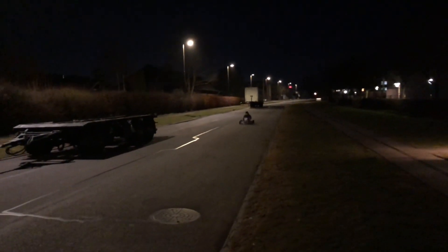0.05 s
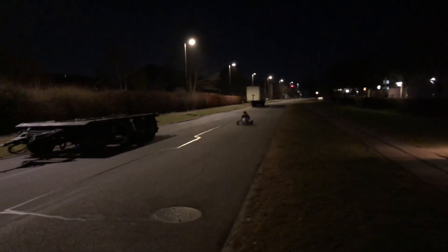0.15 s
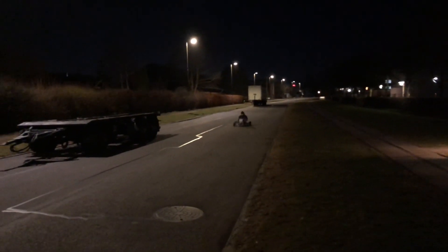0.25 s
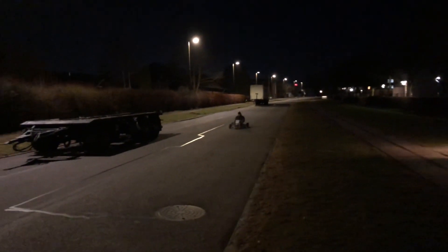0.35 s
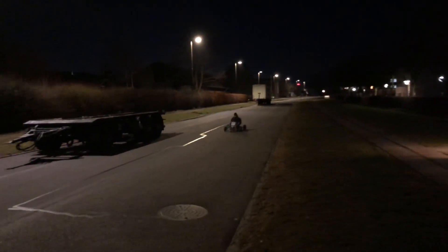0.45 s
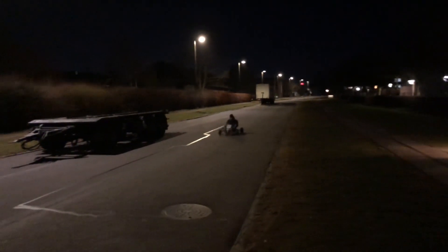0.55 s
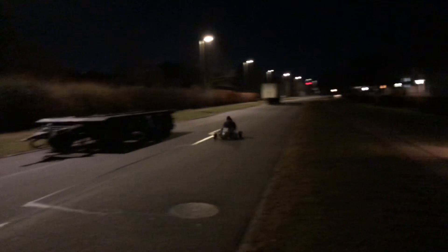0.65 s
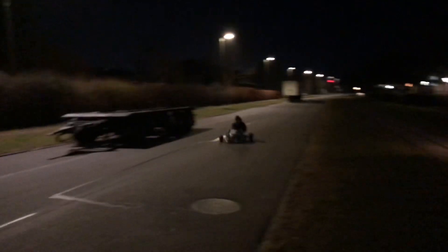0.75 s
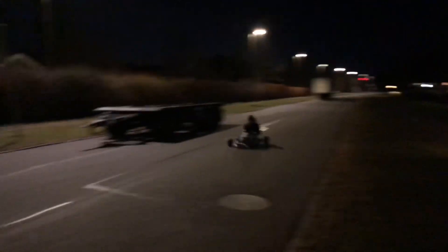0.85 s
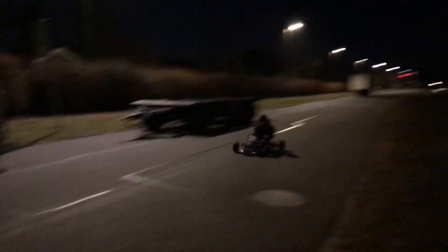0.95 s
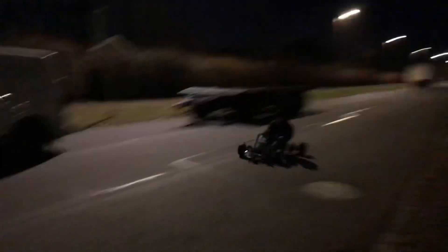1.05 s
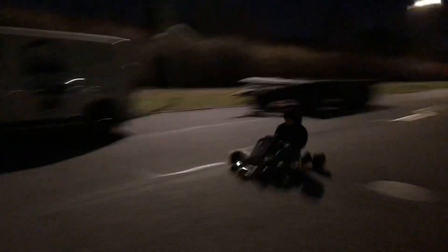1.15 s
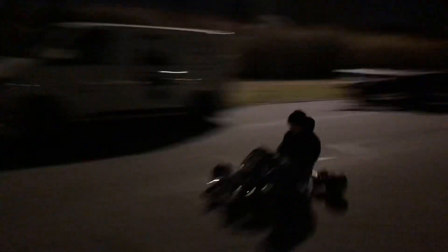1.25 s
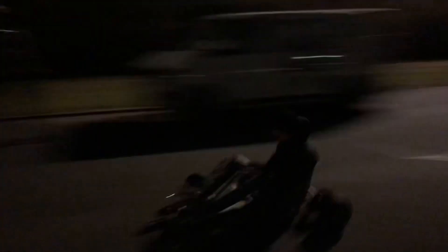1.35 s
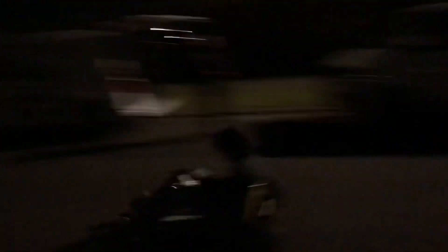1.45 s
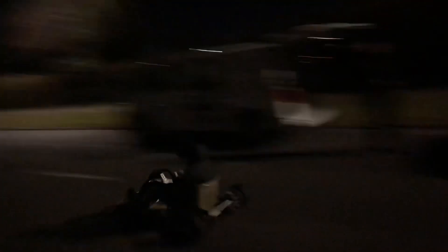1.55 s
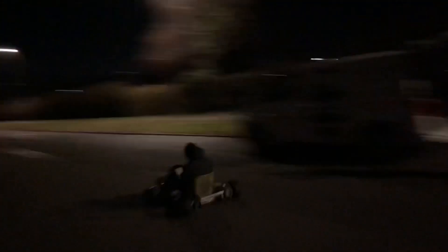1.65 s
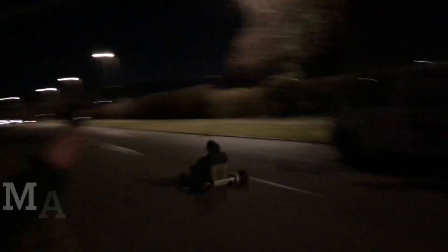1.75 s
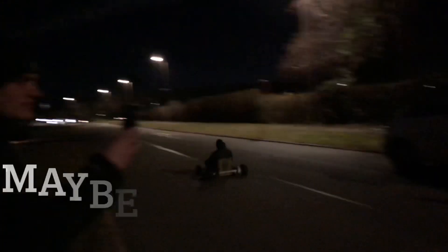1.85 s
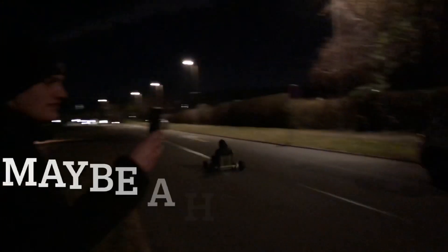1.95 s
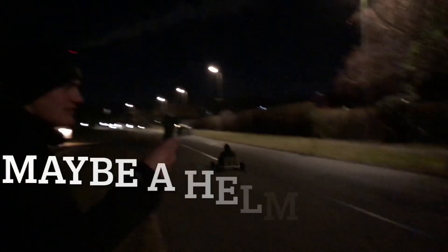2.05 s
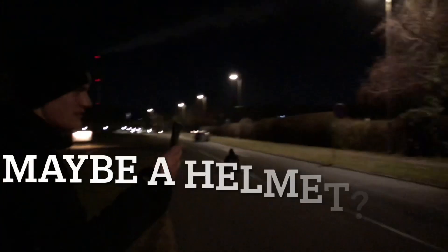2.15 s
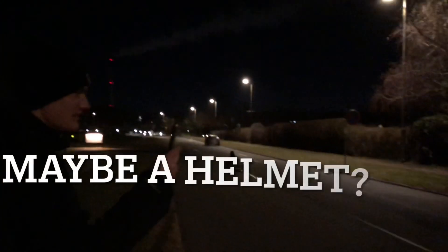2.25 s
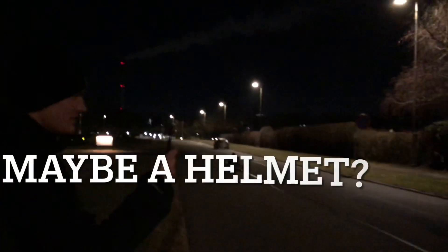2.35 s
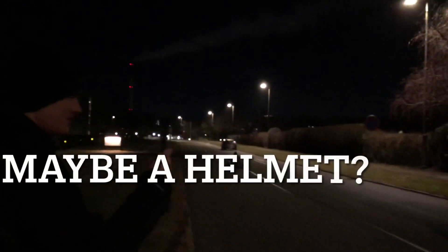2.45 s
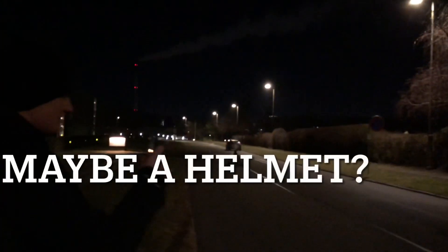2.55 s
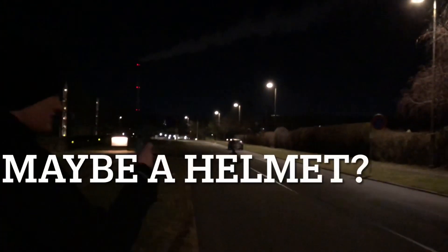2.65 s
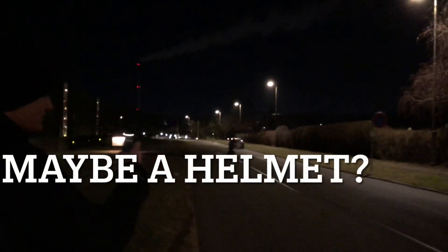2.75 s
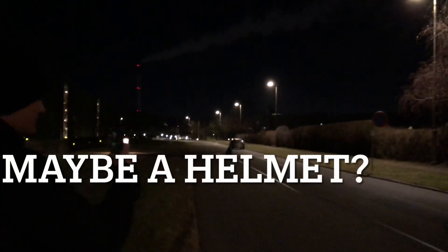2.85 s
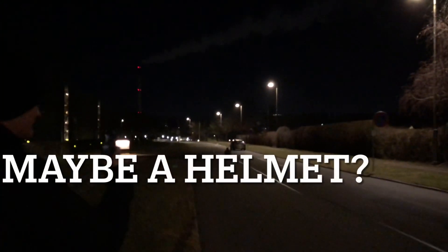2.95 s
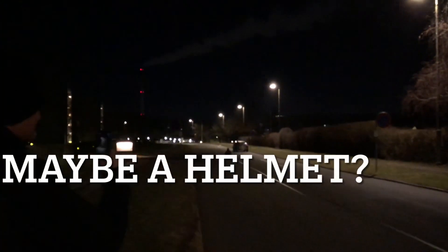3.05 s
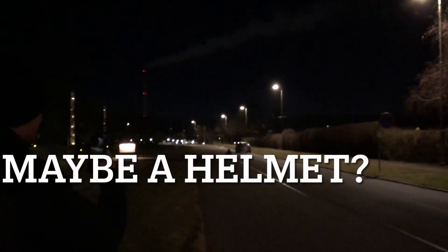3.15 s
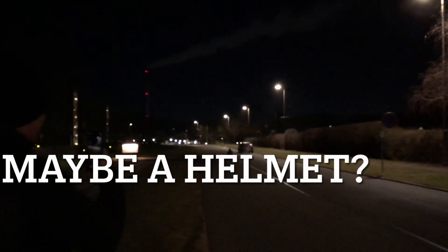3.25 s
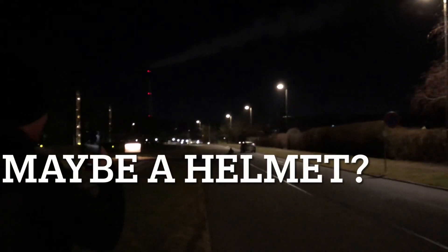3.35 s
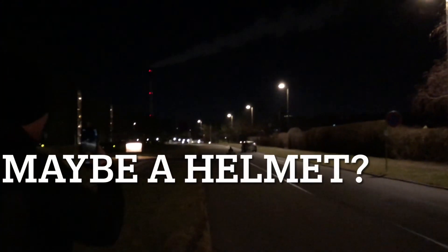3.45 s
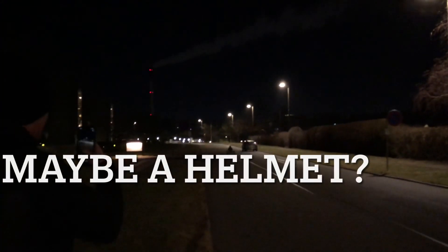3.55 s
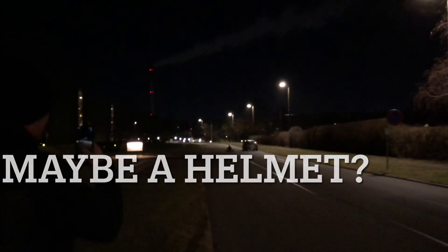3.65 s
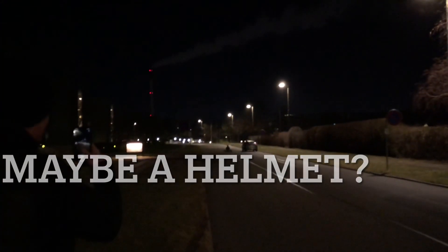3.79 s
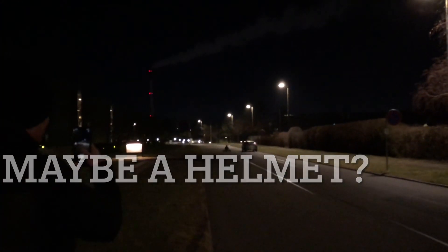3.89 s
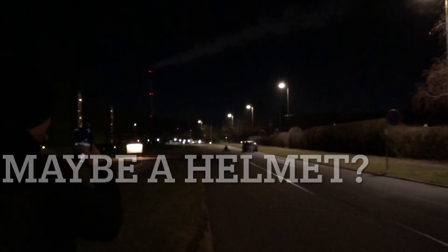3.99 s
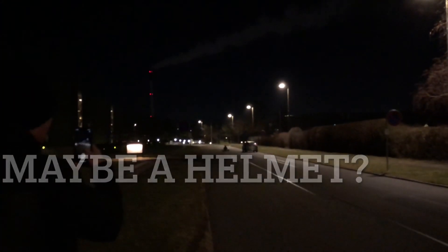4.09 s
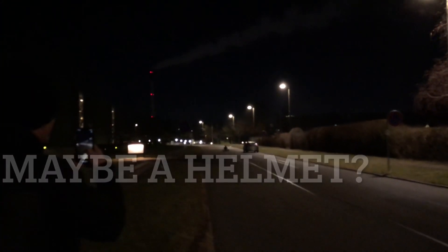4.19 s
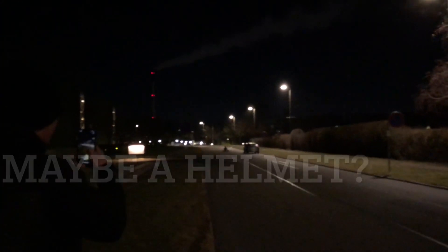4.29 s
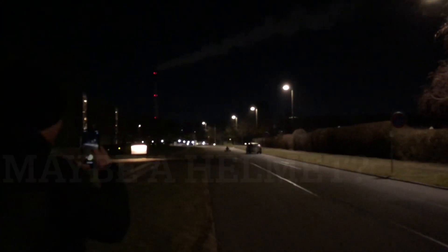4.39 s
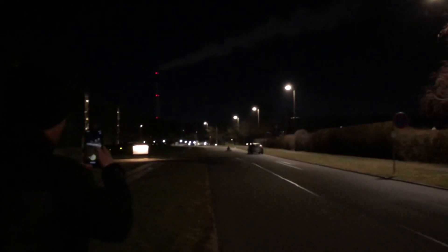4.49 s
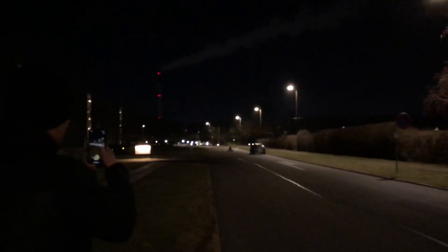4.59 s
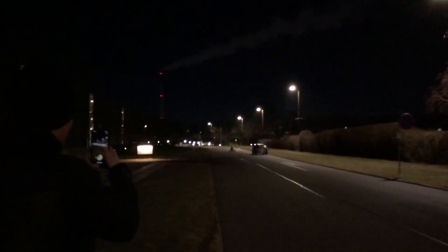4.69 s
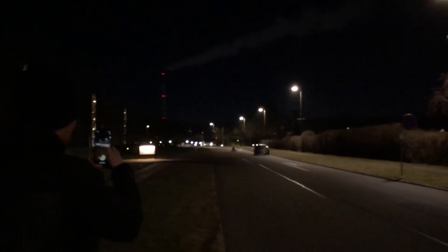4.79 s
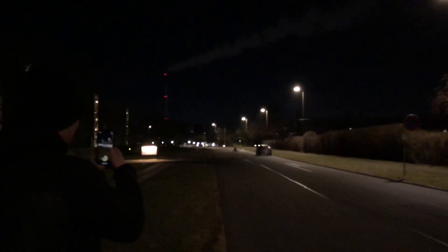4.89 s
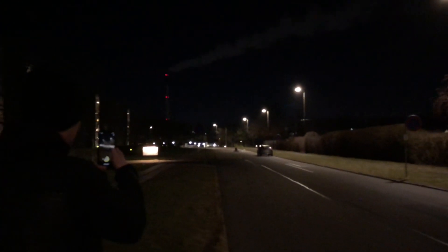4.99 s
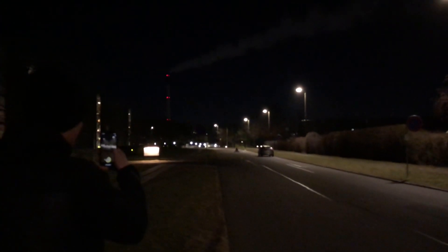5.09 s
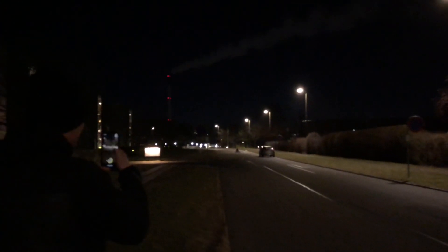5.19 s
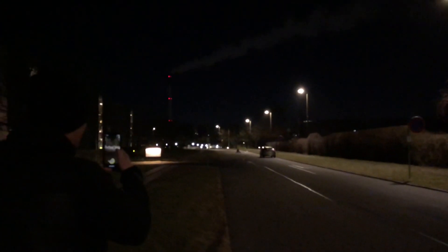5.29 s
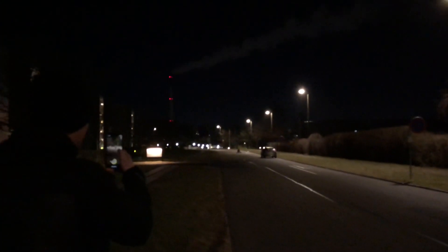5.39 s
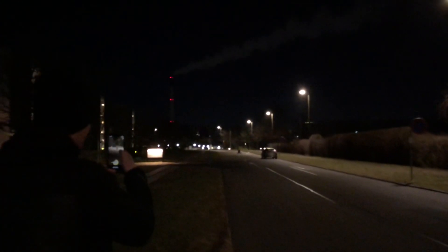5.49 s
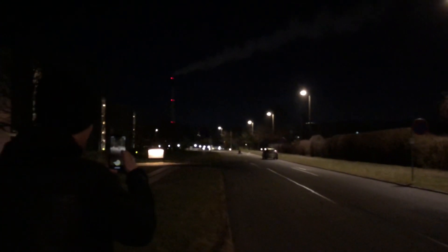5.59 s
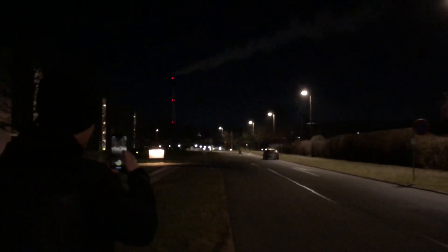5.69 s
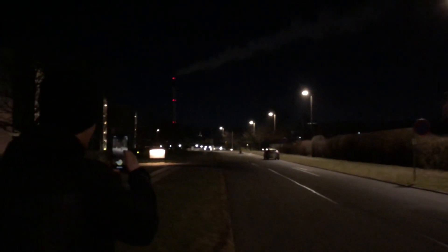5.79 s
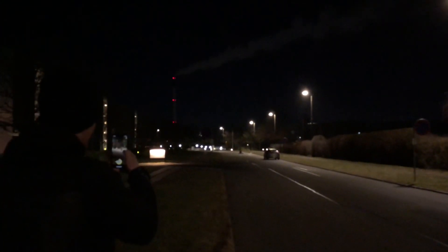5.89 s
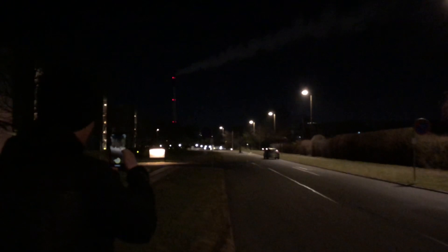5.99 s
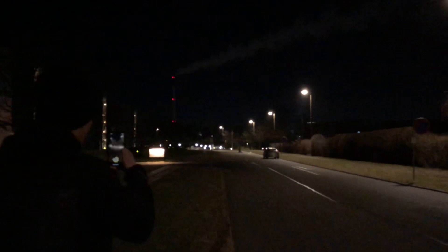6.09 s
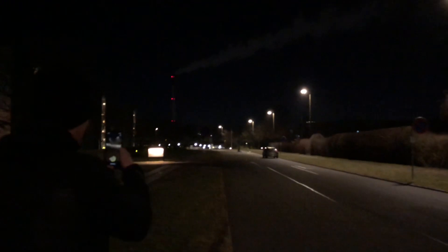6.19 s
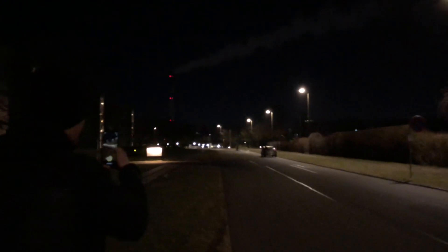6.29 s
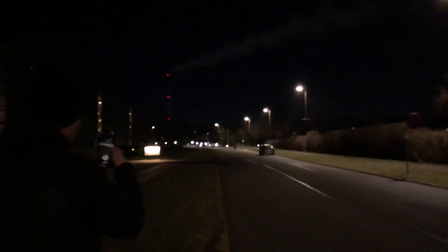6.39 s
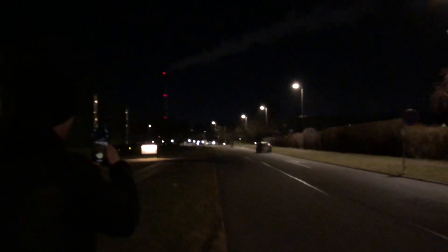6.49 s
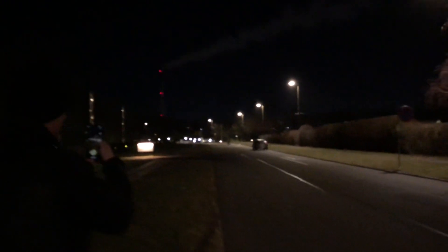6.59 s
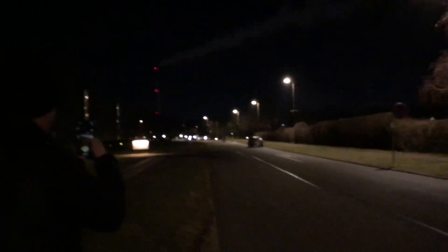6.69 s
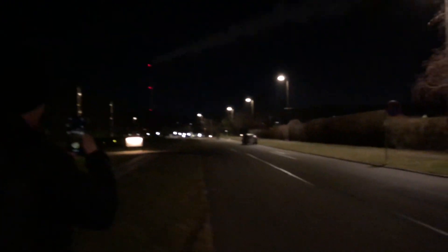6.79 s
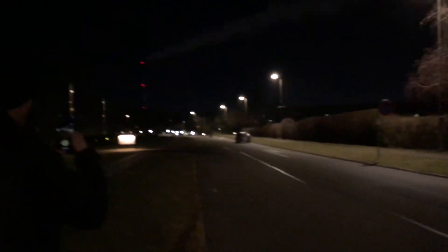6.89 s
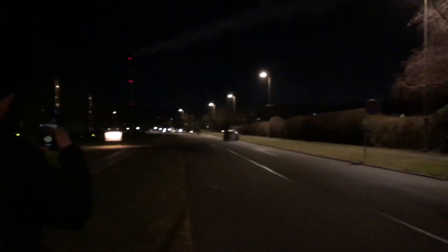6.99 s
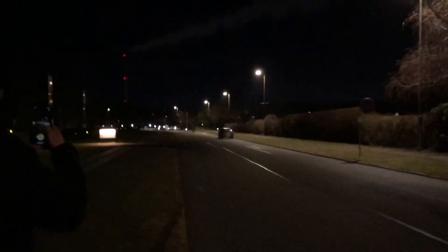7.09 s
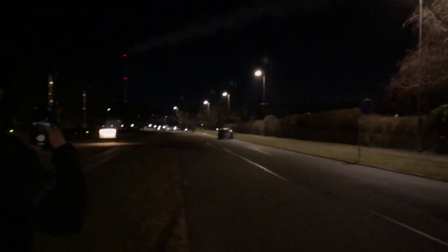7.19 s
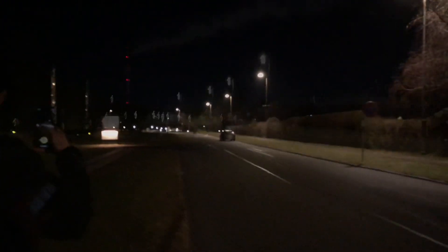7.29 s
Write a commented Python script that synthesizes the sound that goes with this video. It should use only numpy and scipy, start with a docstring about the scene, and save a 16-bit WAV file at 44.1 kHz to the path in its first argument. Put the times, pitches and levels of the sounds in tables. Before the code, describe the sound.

A handheld roadside microphone catches one fast pass of a small electric kart: rough metallic chain clatter and a buzzing high whine, asphalt tyre roar, a sudden close swell and short low gust. The pitch drops as it leaves, the tone growing clearer and more singing from behind. Then it coasts, slackening and sliding steadily lower into the distance, over a dim low town rumble, faint hiss and dry ticks.

```python
"""Electric go-kart at night

An electric go-kart comes down a street, passes close to the microphone, runs away and then coasts.
The teeth of its motor sprocket make the chain whine and rattle; the frame rings and the tyres roar.
Its wake buffets the microphone. A parked lorry and the hedges echo it, a trailer mirrors it,
and faint tones, hiss and ticks join the low wash of a quiet town. Sines make the tones, noise the rest."""
import sys
import numpy as np
from scipy import signal
from scipy.fft import rfft, irfft
from scipy.io import wavfile
from scipy.ndimage import map_coordinates

SR = 44100
rng = np.random.default_rng(int(sys.argv[2]) if len(sys.argv) > 2 else 0)


def store_pcm(level_fs):
    """Save levels as 16-bit WAV."""
    pcm = np.round(np.clip(level_fs, -1, 1) * 32767).astype(np.int16)
    wavfile.write(sys.argv[1], SR, np.atleast_2d(pcm).T)


N = 323694
TIME = np.arange(N) / SR  # seconds
FREQS = np.maximum(np.fft.rfftfreq(N, 1 / SR), 1)  # Hz
TEETH = 10  # on the motor sprocket
SOUND_M_S = 343
NEAR_M = 4.97  # closer than about this, the level flattens out


def undb(db):
    """Turn decibels into a gain."""
    return 10 ** (np.asarray(db) / 20)


def curve(rows):
    """Draw lines through a table of (seconds, value, ..): one value per sample for each column."""
    seconds, *columns = np.transpose(rows)
    return np.squeeze([np.interp(TIME, seconds, column) for column in columns])


def unit(x):
    """Scale a sound to rms 1."""
    return x / np.std(x)


def noise():
    """White noise."""
    return rng.standard_normal(N)


def walk(rate, size=8192):
    """A smooth random wander of spread about 1 that changes about rate times a second."""
    return unit(np.interp(2 * rate * TIME, np.arange(size), rng.standard_normal(size)))


def colour(x, points):
    """Filter a sound by a spectrum of (Hz, dB) points."""
    hz, db = np.transpose(points)
    gain = undb(np.interp(np.log(FREQS), np.log(hz), db))
    return irfft(rfft(x) * gain, N)


def band(x, lo_hz, hi_hz):
    """Keep the part of a sound between two frequencies."""
    return irfft(rfft(x) * ((FREQS > lo_hz) & (FREQS < hi_hz)), N)


def resonance(hz, centre, width):
    """Power response of one resonance, 1 at its centre."""
    return 1 / (1 + (2 * (hz - centre) / width) ** 2)


def delay(x, seconds):
    """The same sound, later."""
    return np.interp(TIME - seconds, TIME, x, left=0)


def swell(at, half):
    """A bell-shaped rise and fall around one moment, 1 at its top."""
    return np.exp(-((TIME - at) / half) ** 2)


def by_side(facing, values):
    """Blend between the values of the sides that the kart shows."""
    return np.interp(facing, np.arange(len(values)), values)


def tone(turns, order, smear, smear_hz=34):
    """A sine at a multiple of a turning rate, rms about 1; random sidebands smear its pitch."""
    rate = smear_hz * max(1, order / TEETH)  # high multiples smear over a wider band
    angle = 2 * np.pi * (order * turns + rng.random())
    steady = (np.sqrt(2) + smear * walk(rate)) * np.sin(angle)
    smeared = smear * walk(rate) * np.cos(angle)
    return (steady + smeared) / np.sqrt(1 + smear ** 2)


# Colour of the town's wash. Each row: frequency in Hz, level in dB.
TOWN = [(25, -27.5), (45, -1.5), (75, 4), (120, 5.5), (250, -6), (380, -9.5), (620, 2), (1100, -17.5),
        (2000, -14.5), (3000, -9), (4200, -29), (8500, -33), (10500, -40.5), (15000, -54.5)]
# A faint far-off tone. Each row: time in seconds, pitch in Hz, level in dB.
FAR_TONE = [(0, 1022, -89.5), (4.2, 950, -54), (4.6, 979.4, -60), (5.3, 1103, -58), (5.6, 1180, -67),
            (7.34, 1168, -94)]
TOWN_DB = -49.5


def town():
    """The low wash of a town at night is filtered noise, with one faint gliding sine in it."""
    hz, db = curve(FAR_TONE)
    wash = unit(colour(noise(), TOWN)) * undb(TOWN_DB + .7 * walk(2.7))
    return wash + undb(db) * tone(np.cumsum(hz) / SR, 1.0, 0.94)


# One faint hiss: middle in seconds, half length in seconds, centre in Hz, width in Hz,
# level in dB at the top of the swell.
FAR_HISS = (6.77, .27, 3050, 600, -52)


def far_hiss():
    """A narrow band of noise swells and fades in the distance."""
    at, half, hz, width_hz, db = FAR_HISS
    hiss = unit(irfft(rfft(noise()) * resonance(FREQS, hz, width_hz), N))
    return hiss * undb(db + 1.3 * walk(8.9)) * swell(at, half)


# Small dry ticks. Each row: start in seconds, level in dB before colouring.
CLICKS = [(6.674, -35), (6.934, -46), (7.199, -47)]


def clicks(decay_s=0.004):
    """Each dry tick is a burst of noise that dies away within milliseconds."""
    bursts = sum(undb(db) * (TIME > s) * np.exp(-np.abs(TIME - s) / decay_s) for s, db in CLICKS)
    spectrum = [(500, -18), (2500, 0), (6000, 2), (7500, -12), (9000, -18), (15000, -35)]
    return colour(noise() * bursts, spectrum)


# Low hums around and after the closing of the throttle.
# Each row: middle in seconds, half length in seconds, nominal pitch in Hz, level in dB.
HUMS = [(3.82, .11, 587, -46), (4.01, .08, 595, -50), (4.12, .12, 708, -50), (4.14, .1, 407, -46.5),
        (4.76, .2, 700, -54), (5.02, .22, 598, -51)]


def hums(smear=0.26):
    """Soft low tones of steady pitch swell and fade."""
    # each tone sounds slightly below its nominal pitch
    return sum(undb(db) * swell(at, half) * tone(hz * TIME, 0.97, smear) for at, half, hz, db in HUMS)


GUST_S, GUST_ATTACK_S, GUST_HOLD_S, GUST_RELEASE_S = 1.19, 0.057, 0.27, .04
GUST_DB, DRAUGHT_DB = -36, -39.5  # the draught's level is before the loss with distance


def wake(spread_db):
    """Air pushed over the microphone makes a short low buffet over a weak draught."""
    spectrum = [(25, -40.5), (36, -23), (60, -1.0), (110, -5.0), (230, -6.0), (500, -13.5), (2000, -54.0)]
    rumble = unit(colour(noise(), spectrum))
    early = np.maximum(GUST_S - TIME, 0)
    late = np.maximum(TIME - GUST_S - GUST_HOLD_S, 0)
    gust = undb(GUST_DB) * np.exp(-early / GUST_ATTACK_S - late / GUST_RELEASE_S)
    push = gust + undb(DRAUGHT_DB + spread_db)
    return rumble * push * undb(2 * walk(11))


# Level of the clear echo off the lorry. Each row: time in seconds, level against the direct sound in dB.
ECHO = [(0, -26), (3.9, -24), (4.42, -15), (4.58, -5), (4.67, -4.5), (4.8, -12), (5.1, -15), (7.34, -16)]
ECHO_S = .06023  # extra travel time of the echo


def street(x, t60=0.56, wet_db=-17):
    """Add one clear echo from the lorry, and a thin decaying scatter from hedges and kerbs."""
    t = TIME[:SR]
    grain = colour(noise(), [(100, -4.5), (2500, -5.0), (6000, 1.5), (15000, -24.5)])[:SR]
    scatter = grain * undb(-60 * t / t60) * (t > .015)
    tail = signal.fftconvolve(x, scatter / np.linalg.norm(scatter))[:N]
    return x + undb(curve(ECHO)) * delay(x, ECHO_S) + undb(wet_db) * tail


KERB_M = 2.68  # closest distance of the kart
MIRROR_M, MIRROR_REACH_M = 9, 9.3  # closest distance of the mirror image, reach of the reflection
MIRROR_DB = -7  # before the losses with distance


def trailer(x, metres):
    """A trailer parked across the road reflects the kart: the longer path has its own Doppler shift,
    so the tones split as the kart goes by."""
    mirrored = np.sqrt(metres ** 2 - KERB_M ** 2 + MIRROR_M ** 2)
    reach = np.exp(-(metres / MIRROR_REACH_M) ** 2)
    gain = undb(MIRROR_DB) * reach * np.hypot(metres, NEAR_M) / np.hypot(mirrored, NEAR_M)
    extra_s = (mirrored - metres) / SOUND_M_S
    return gain * map_coordinates(x, [(TIME - extra_s) * SR], mode="nearest")


# Colour of the tyre roar. Each row: frequency in Hz, level in dB.
TYRES = [(40, -31), (70, -9), (130, -4), (270, -3), (500, 2), (800, -0.5), (1300, -2.5), (2200, -5),
         (5000, -16.5), (10000, -50)]


def tyres(roar_db, patchy_db=1.0):
    """Small slick tyres roar on patchy asphalt: filtered noise of uneven level."""
    x = colour(noise(), TYRES)
    x = x / np.std(band(x, 600, 1300))
    return x * undb(roar_db + patchy_db * walk(39))


# Resonances of frame and motor mount. Each row: centre in Hz, width in Hz,
# lift in dB for a tone that slides through, strength of its own ring in dB against the other rows.
FRAME = [(424, 76, 11.5, 3.5), (589, 22, 7, -1), (699, 25, 3, -5.5), (1737, 227, 8.5, -2),
         (2199, 136, 8.5, -1.5), (2780, 41, 4.5, -16), (3210, 500, 4.5, -10), (3457, 106, 12.5, -10),
         (4390, 450, 1, -9.5)]
FRAME_TAUT_DB, FRAME_SLACK_DB = -34, -23.5  # under a taut and a slack chain, before distance and speed
FRAME_FALL = 0.42  # share of the fall with distance that the ring follows
FRAME_SPEED_POWER = 2.87  # dB lost for each dB that the motor slows


def lift(hz):
    """Decibels that the frame's resonances add to a tone."""
    return sum(db * resonance(hz, f, w) for f, w, db, _ in FRAME)


def frame(throttle, spread_db, speed_db):
    """Tubes and floor pan ring at fixed pitches, whatever the speed; a slack chain shakes them hardest."""
    shape = sum(undb(db) * resonance(FREQS, f, w) for f, w, _, db in FRAME)
    ring = unit(irfft(rfft(noise()) * shape, N))
    shake_db = throttle * FRAME_TAUT_DB + (1 - throttle) * FRAME_SLACK_DB + FRAME_SPEED_POWER * speed_db
    return ring * undb(shake_db + FRAME_FALL * spread_db + 1.0 * walk(13))


# Depth of the kart's directional lobes for tones and rattle, and changes per second.
LOBE_TONE_DB, LOBE_RATTLE_DB, LOBE_RATE = 1.8, 1.1, 17


def lobe(close, depth_db):
    """A gain that comes and goes while the kart is close, with about the same mean power."""
    spread_db = depth_db * close
    return undb(spread_db * walk(LOBE_RATE) - spread_db ** 2 * np.log(10) / 20)


def lobes(x, close, count=14):
    """Give each band of the rattle its own lobes, which sweep over the microphone."""
    spectrum, centres = rfft(x), np.geomspace(1500, 14000, count)
    out = 0
    for weights in np.eye(count):
        part = irfft(spectrum * np.interp(FREQS, centres, weights), N)
        out = out + part * lobe(close, LOBE_RATTLE_DB)
    return out


def air(x, shine, mid_power=0.93, top_power=1.62):
    """Scale the treble by a moving gain; the higher the band, the more it follows."""
    spectrum, centres = rfft(x), (4000, 7000, 12500)
    out = 0
    for weights, power in zip(np.eye(len(centres)), (0, mid_power, top_power)):
        out = out + irfft(spectrum * np.interp(FREQS, centres, weights), N) * shine ** power
    return out


# Colour of the rattle from ahead, from behind and with a slack chain.
# Each row: frequency in Hz, level in dB before the treble is scaled.
RATTLE_AHEAD = [(700, -30.5), (1400, -6), (2000, -3), (2600, -1), (3800, 0), (5000, -2.5), (6000, -7),
                (7500, -8), (8500, -12.5), (10200, -15), (11000, -20.5), (12700, -21.5), (15500, -30)]
RATTLE_BEHIND = [(700, -13), (1400, -5), (2300, 0.5), (3400, 1.5), (4100, 0), (4750, 1.5), (5400, -5),
                 (6100, -2), (7200, -5.5), (8000, -8), (9500, -12), (10600, -19.5), (11900, -17),
                 (15500, -34.5)]
RATTLE_SLACK = [(700, -33), (1300, -32.5), (2200, 3), (3100, 2), (4300, -1.5), (5400, -4), (6300, -2.5),
                (7500, -8.5), (8700, -11), (9800, -23), (12000, -28.5), (15500, -51)]
# The rattle swells and fades, and so does its treble.
# Each row: time in seconds, change of level in dB, change of treble in dB before air() weighs it.
RATTLE_SWELL = [(0, 0.5, -2), (.42, 0.5, 1), (.8, 0, 0), (1.0, 1, -3.5), (1.13, 0.8, -0.5), (1.25, 3, -1.1),
                (1.41, 1.5, -0.4), (1.52, -1.5, 0.5), (1.62, -1.5, 0), (1.74, 0, 1), (2.05, -1, -1),
                (2.26, -1, 1), (2.42, -1.7, 1), (2.6, 1, -3), (2.95, 1.5, -3.5), (3.45, -0.5, 1),
                (3.85, 0, -1.5), (4.25, -0.5, 1.5), (4.6, 2.5, -1), (5.1, 4, -2.5), (5.68, 0.5, 0.5),
                (5.95, 1, 1), (6.9, 3, -2), (7.34, -1, 2)]


def rattle(hz, turns, facing, throttle, body_db, treble_db,
           repeat=0.1, bite=0.44, flutter_db=0.94, sway_db=0.64):
    """Rollers clatter on the teeth: noise pulses at the tooth rate, and its treble dies with distance."""
    pulses = 1 + bite * np.cos(2 * np.pi * TEETH * turns)
    strikes = noise() * pulses * undb(flutter_db * walk(70))
    # inner and outer links alternate, so the clatter partly repeats every second tooth
    repeated = repeat * throttle * np.clip(facing + 0.2, 0, 1)
    strikes = strikes + repeated * delay(strikes, 2 / (TEETH * hz))
    behind = np.clip(facing - .5, 0, 1)
    parts = ((RATTLE_AHEAD, throttle * (1 - behind)), (RATTLE_BEHIND, throttle * behind),
             (RATTLE_SLACK, 1 - throttle))
    swell_db, shine_db = curve(RATTLE_SWELL)
    out = 0
    for spectrum, share in parts:
        x = colour(strikes, spectrum)
        x = x / np.std(band(x, 2900, 4300))  # body at rms 1
        shine = undb(treble_db + shine_db) / np.std(band(x, 8000, 14000))
        out = out + share * air(x, shine)
    return out * undb(body_db + swell_db + sway_db * walk(8))


# Tones of the drive. Each row: multiple of the motor turn, then level against the rattle in dB, before
# the changes below, from ahead, beside, rear quarter, behind, far behind, and when coasting.
TONES = [(1, -20, -14.5, -19, -15, -13, -37), (2, -16, -19.5, -25.5, -15.5, -14, -13),
         (3, -21, -32, -21.5, -40, -36, -15), (5, -34, -19, -17.5, -14.5, -27, -20.5),
         (7, -29, -17.5, -18.5, -9, -17.5, -27.5), (8, -16, -13.5, -7.5, -14.5, -17, -12),
         (9, -16.5, -16, -16.5, -5.5, -7, -16.5), (11, -16.5, -5, -22, -14, 0, -9),
         (12, -12, -15.5, -31.5, -17, -10, -10.5), (13, -14, -16.5, -25, -12.5, -13, -23.5),
         (14, -25.5, -21.5, -26.5, -20, -13, -27.5), (15, -11.5, -6, -3, -7.5, -6, -30.5),
         (19, -22, -7.5, -1.5, 3.5, -35, -34.5), (20, -7.5, .5, -3, 1, -2, -18),
         (21, -18, -6, -17, -5, -25.5, -19.5), (25, -27, -14, -7.5, -8, -11, -29.5),
         (26, -29.5, -4.5, -14, -24, -15, -25.5), (29, -4, -10.5, -4.5, -16, -29, -26.5),
         (30, -6.5, -23, -7, -11, -7, -29), (40, -10, -5.5, -5.5, -11, -16, -33),
         (50, -25, -11, -13, -17, -18, -31)]
# Single tones of the drive swell and fade: some briefly as the kart goes by, others while it coasts
# and they slide through the frame's resonances.
# Each row: multiple of the motor turn, middle in seconds, half length in seconds, change in dB.
TONE_SWELLS = [(7, 1.33, .08, 6), (7, 1.51, .035, 6), (8, 1.21, .07, 9), (8, 1.7, .12, -4),
               (8, 1.96, .07, 3), (8, 4.3, .22, 5), (8, 4.8, .07, 6), (8, 5.4, .25, 4), (9, 1.55, .04, 5),
               (9, 2.92, .16, 4), (9, 3.72, .17, 5), (11, 1.56, .07, 5), (11, 3.72, .1, -7),
               (11, 6.3, .22, 5), (11, 1.4, .06, 3), (12, 5.45, .12, 8), (12, 6.36, .08, 9),
               (12, 6.65, .09, 8), (15, 1.42, .035, 7), (15, 1.61, .05, 3), (15, 1.75, .09, -10),
               (15, 2.12, .07, 3), (19, 1.62, .06, 4), (19, 1.84, .08, -7), (20, 1.65, .06, -7),
               (20, 1.92, .07, -6), (20, 2.24, .06, -6)]
# How far the drive tones stand out of the rattle. Each row: time in seconds, change in dB.
SINGING = [(0, -2.5), (.9, -1.5), (3.9, -3), (5.5, 4.5), (6.4, 1), (6.8, 2), (7.34, -8)]
# The tones around the octave of the tooth tone swell and fade together.
# Each row: time in seconds, change in dB.
OCTAVE_SWELL = [(0, -5), (.92, -3), (1.05, 3), (1.27, 3), (1.4, -1), (1.52, 1), (1.74, 3), (1.86, -1.5),
                (2.0, 1), (2.3, -3), (2.5, 1.5), (2.85, 1.5), (2.97, -3), (3.1, 2), (3.6, -1)]
# The tooth tone swells and fades. Each row: time in seconds, change in dB.
TOOTH_SWELL = [(0, 7), (.4, -8), (.7, 8), (1.11, 2), (1.3, -1), (1.44, 2), (1.52, -2), (1.59, 4),
               (1.82, -5), (1.95, -1.5), (2.25, 3.5), (2.33, 4.5), (2.9, 4.5), (3.35, 0), (3.69, 8),
               (4.02, -12), (4.13, 1.5), (4.34, 3.5), (4.48, 1.5), (4.64, 5), (4.76, 0.5), (5.02, -3),
               (5.2, 11), (5.34, 3.5), (5.5, 7), (5.87, 7), (5.96, -2), (6.3, -4), (6.6, -9), (6.92, 2.5),
               (7.34, -1)]
# Smear of the tooth tone, ragged as the throttle closes.
# Each row: time in seconds, smear as a share before the roughness from ahead.
TOOTH_SMEAR = [(0, .34), (1.5, .3), (2.2, .22), (2.9, .28), (3.5, .6), (3.9, .5), (4.15, .25), (4.65, .3),
               (5.1, .4), (5.5, .15), (5.85, .13), (6.05, .5)]
TOOTH_COAST_DB = -0.5  # tooth tone against the rattle when coasting, before its swells
ROUGH_AHEAD = .9  # extra share of smear while the kart comes nearer
HEAD_ON_TONE_DB = -20  # further screening by the seat, growing with pitch: this much at 10000 Hz


def whine(hz, turns, facing, throttle, close, head_on, chain_db, tooth_db, treble_db,
          smear=0.47, smear_growth=0.54, waver_db=-0.5):
    """Teeth strike the chain ten times a turn and uneven links smear the tone;
    the sprocket runs out of true, so other multiples of the turn sound too."""
    # from ahead the tones arrive by way of the road and the frame, which roughens them
    rough = 1 + ROUGH_AHEAD * np.clip(1.5 - facing, 0, 1)
    tooth_db = throttle * tooth_db + (1 - throttle) * TOOTH_COAST_DB
    tooth_db = tooth_db + lift(TEETH * hz) + curve(TOOTH_SWELL)
    tooth = tone(turns, TEETH, curve(TOOTH_SMEAR) * rough)
    out = tooth * undb(chain_db + tooth_db + waver_db * walk(7.7)) * lobe(close, LOBE_TONE_DB)
    singing_db, octave_db = chain_db + curve(SINGING), curve(OCTAVE_SWELL)
    for order, *sides, coast_db in TONES:
        order = round(order)
        db = singing_db + throttle * by_side(facing, sides) + (1 - throttle) * coast_db
        db = db + lift(order * hz) + octave_db * (abs(order - 2 * TEETH) <= 1)
        for multiple, at, half, change_db in TONE_SWELLS:
            if multiple == order:
                db = db + change_db * swell(at, half)
        # the highest tones are screened and lost with distance like the treble of the rattle
        height = np.maximum(order * hz - 5500, 0) / 4500
        db = db + (treble_db + HEAD_ON_TONE_DB * head_on) * height
        # the high tones smear most; those under the tooth tone run cleaner without load
        load = (1 + 2 * throttle) / 3 if order < TEETH else 1
        blur = rough * smear * (order / TEETH) ** smear_growth * load
        # tones under the tooth tone spread more evenly, with shallower lobes
        depth_db = LOBE_TONE_DB * min(order / TEETH, 1)
        out = out + undb(db) * tone(turns, order, blur) * lobe(close, depth_db)
    return out


METRES_PER_TURN, PASSES_S = .0669, 1.44  # road covered per motor turn, moment of closest approach


def path(motor_hz):
    """Distance (m), share of the front turned to the microphone (0-1) and Doppler factor."""
    along = np.cumsum(motor_hz) * METRES_PER_TURN / SR
    along = along - np.interp(PASSES_S, TIME, along)
    metres = np.hypot(along, KERB_M)
    doppler = 1 / (1 + np.gradient(metres, TIME) / SOUND_M_S)
    return metres, (1 - along / metres) / 2, doppler


HEAD_ON_DB, HEAD_ON_DEGREES = -2.5, 15.4  # seat screens the whole chain within about this angle


def aim(front):
    """How squarely the kart points at the microphone (0-1)."""
    off_axis = np.degrees(np.arccos(2 * front - 1))
    return np.exp(-(off_axis / HEAD_ON_DEGREES) ** 2)


CHAIN_LOSS_DB_PER_M, SLACK_DB = 0.1378, -2.5  # a slack chain is quieter
# treble against the body, before air() weighs it: loss with distance, shadow of seat and driver, slack chain
TREBLE_LOSS_DB_PER_M, SHADOW_DB, SLACK_TREBLE_DB = 0.16, -10.5, 2.5


def chain_levels(body_db, treble_db, metres, front, throttle):
    """Level of the rattle and its treble after distance, slack and screening by seat and driver."""
    slack = 1 - throttle
    body_db = body_db + HEAD_ON_DB * aim(front) + SLACK_DB * slack - CHAIN_LOSS_DB_PER_M * metres
    treble_db = treble_db + SHADOW_DB * front + SLACK_TREBLE_DB * slack - TREBLE_LOSS_DB_PER_M * metres
    return body_db, treble_db


# The motor gains speed, then coasts down. Each row: time in seconds, turns per second.
MOTOR = [(0.0, 233.9), (0.7, 242.7), (1.85, 249.2), (2.7, 253.6), (3.3, 259.4), (3.52, 261.6),
         (3.65, 257.3), (3.95, 251.4), (4.6, 228.7), (4.85, 216.4), (5.6, 187.5), (6.3, 164.4),
         (7.34, 132.0)]
# Side that the kart shows. Each row: time in seconds, side
# (0 ahead, 1 beside, 2 rear quarter, 3 behind, 4 far behind).
FACING = [(0, 0), (1.05, 0), (1.4, 1), (1.6, 1), (1.85, 2), (2.15, 2), (2.35, 3), (2.85, 3), (3.35, 4)]
# Pull on the chain. Each row: time in seconds, pull from 0 to 1.
THROTTLE = [(0, 0.99), (3.56, 0.97), (3.585, 0.52), (4.0, 0.21), (4.15, 0.02), (7.34, 0.07)]
# Sound sent to each side; the rows are ahead, beside, rear quarter, behind, far behind.
# Each row: tyre roar in dB and chain rattle in dB, both before distance and speed, treble of the rattle
# against its body in dB before screening and distance, tooth tone against the rattle in dB before its swells.
SIDES = [(-15, -1.66, 0.5, -10.5), (-15.5, -4.5, 1.5, -2), (-16.5, -4, -0.8, -3.5), (-16.5, -2.5, 0, 1.5),
         (-13, -1.58, -2.5, 0.5)]
CHAIN_SPEED_POWER, TYRE_SPEED_POWER = 1.52, 0.69  # dB lost for each dB that the motor slows
LOBE_REACH_M = 6.5  # the lobes are heard within about this distance


def scene():
    """The kart in the street, over the wash of the town; both channels alike."""
    motor_hz, facing, throttle = curve(MOTOR), curve(FACING), np.clip(curve(THROTTLE), 0, 1)
    metres, front, doppler = path(motor_hz)
    hz = motor_hz * doppler
    # levels follow distance, speed and the side that the kart shows
    spread_db = -20 * np.log10(np.hypot(metres, NEAR_M))
    speed_db = 20 * np.log10(motor_hz / motor_hz.max())
    tyre_db, chain_db, treble_db, tooth_db = (by_side(facing, column) for column in np.transpose(SIDES))
    tyre_db = tyre_db + spread_db + TYRE_SPEED_POWER * speed_db
    chain_db = chain_db + spread_db + CHAIN_SPEED_POWER * speed_db
    chain_db, treble_db = chain_levels(chain_db, treble_db, metres, front, throttle)
    # bumps in the road make the motor speed tremble, and under load it also wanders
    wander = .0013 * throttle * walk(6)
    turns = np.cumsum(hz * (1 + 0.00061 * walk(33) + wander)) / SR
    close = np.exp(-(metres / LOBE_REACH_M) ** 4)
    background = town() + far_hiss() + clicks() + hums() + wake(spread_db)
    clatter = lobes(rattle(hz, turns, facing, throttle, chain_db, treble_db), close)
    drive = whine(hz, turns, facing, throttle, close, aim(front), chain_db, tooth_db, treble_db)
    kart = tyres(tyre_db) + frame(throttle, spread_db, speed_db) + clatter + drive
    mono = background + street(kart) + trailer(kart, metres)
    return np.array([mono, mono])


TOP_HZ = 15620


def record(dry):
    """The recorder rounds the highest peaks and cuts the rumble and the top."""
    rounded = dry / (1 + (dry / .78) ** 8) ** (1 / 8)
    rounded = signal.sosfilt(signal.butter(4, 36, "highpass", fs=SR, output="sos"), rounded)
    return signal.sosfilt(signal.ellip(12, .1, 80, TOP_HZ, fs=SR, output="sos"), rounded)


dry = scene()
out = record(dry)
store_pcm(out)
```